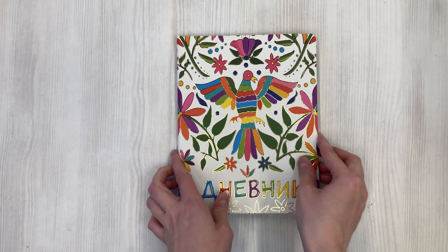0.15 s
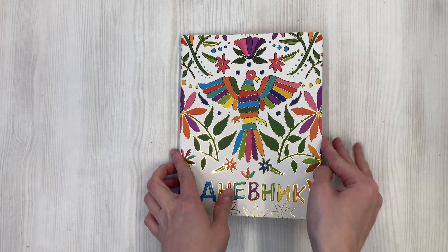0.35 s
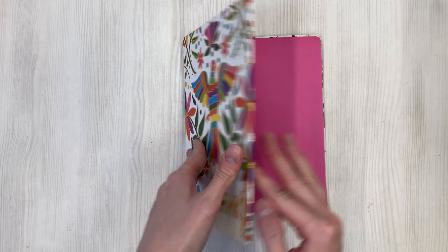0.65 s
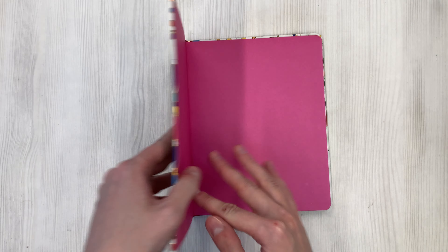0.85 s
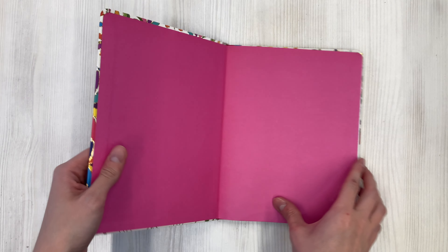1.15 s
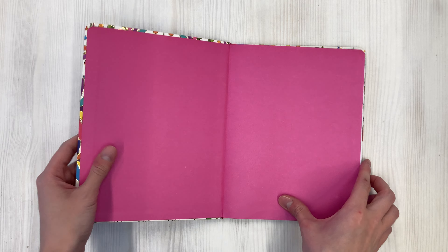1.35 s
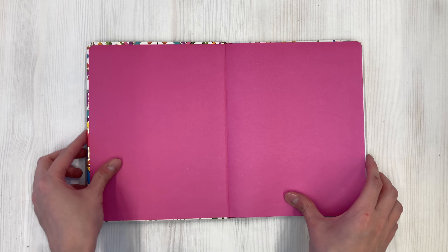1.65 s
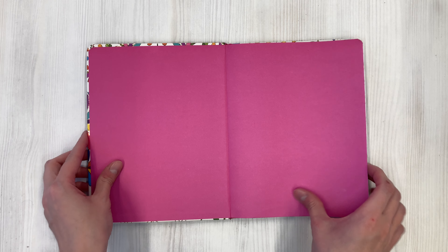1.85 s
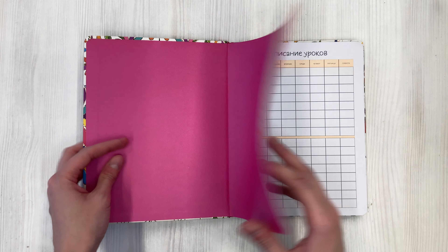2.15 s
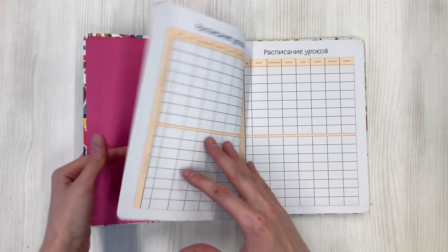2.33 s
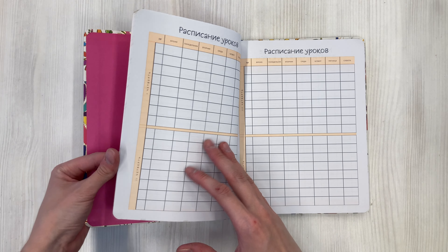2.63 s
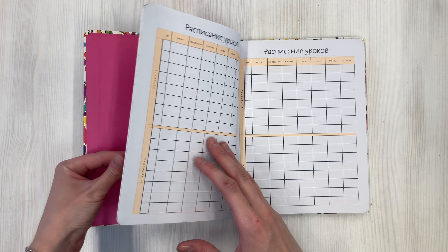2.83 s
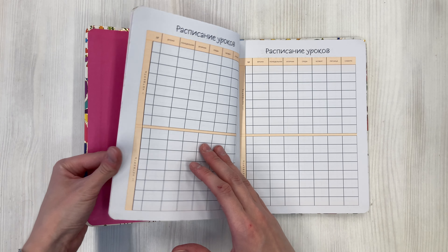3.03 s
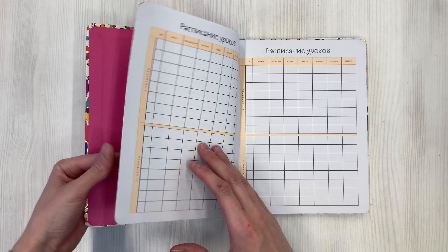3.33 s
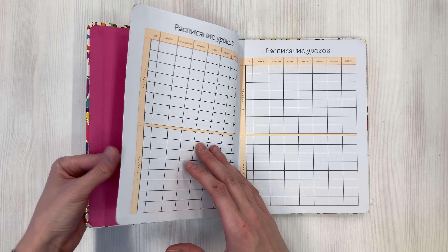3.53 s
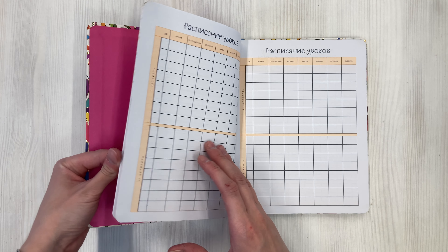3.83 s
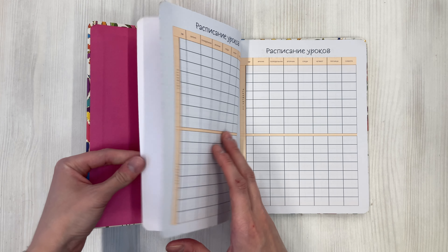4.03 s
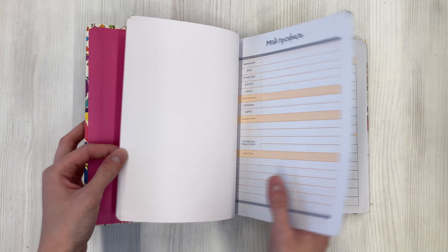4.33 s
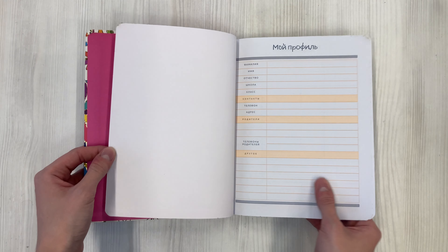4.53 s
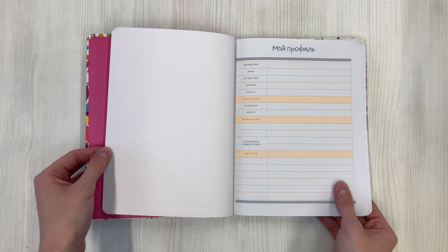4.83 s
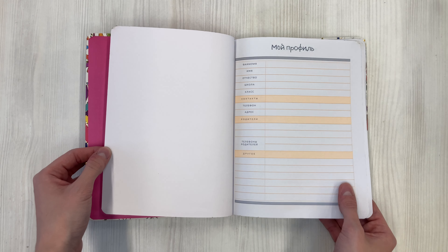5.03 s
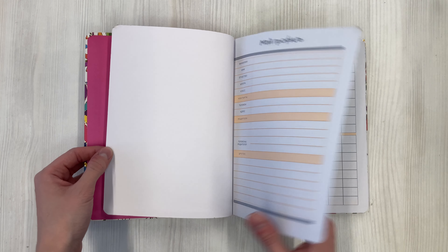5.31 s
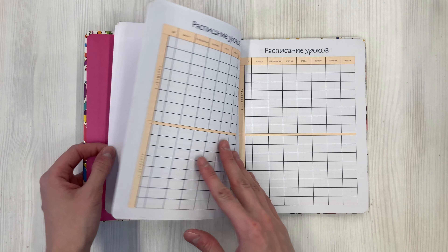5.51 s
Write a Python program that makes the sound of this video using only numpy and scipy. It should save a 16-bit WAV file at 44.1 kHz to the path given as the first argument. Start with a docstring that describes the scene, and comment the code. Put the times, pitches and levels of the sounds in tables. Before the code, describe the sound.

In a quiet room with a low steady hum, hands shift a hardcover notebook with a knock and small thump. Ticking cracks lead to loud snaps as the stiff cover opens, with rustle and a soft push of air. A page turns, fingers rub faintly, then two more page turns bring brisk swishes and papery flaps. Phone close above the table, slight room reflections.

```python
"""A quiet humming room: hands open a stiff hardcover book on a table and turn its pages, under a phone.
The hum is coloured noise with two narrow drones. Fingers hiss and sheets swish as shaped noise.
Sheets and cover flap and knock as short ringing noise puffs. The glued spine cracks and crackles:
noise bursts through its resonances. Wall bounces and a short room tail surround the pops and cracks."""
import sys
import numpy as np
from scipy import signal
from scipy.fft import rfft, irfft, next_fast_len
from scipy.io import wavfile
from scipy.ndimage import uniform_filter1d, map_coordinates

SR = 44100
rng = np.random.default_rng(int(sys.argv[2]) if len(sys.argv) > 2 else 0)


def materialize(psi):
    """Save the field psi as 16-bit PCM at rate SR to the path in sys.argv[1].

    A 1-D psi becomes a single channel; in a 2-D psi each row is a channel.
    """
    bounded = np.clip(np.atleast_2d(psi).T, -1, 1)
    quanta = np.round(bounded * 32767).astype(np.int16)
    wavfile.write(sys.argv[1], SR, quanta)


N = 250047

# left-right likeness of the hum and of the air pushed by the cover: pitch_hz, likeness (1 = same)
HUM_LIKENESS = [(25, 0.94), (60, 1), (200, 0.89), (330, 0.78), (600, 0.073), (1500, 0.1), (4000, 0.059)]
# left-right likeness of the book's noises: pitch_hz, likeness (1 = same)
BOOK_LIKENESS = [(600, 1), (1500, 0.75), (2500, 0.21), (5000, 0.21)]


def amp(db):
    """dB to gain."""
    return 10 ** (np.asarray(db) / 20)


def unit(x):
    """Scaled to rms 1."""
    return x / np.sqrt(np.mean(x ** 2) + 1e-20)


def along(points, hz):
    """Reads (Hz, value) points on a log frequency axis."""
    point_hz, values = np.transpose(points)
    return np.interp(np.log(hz + 1), np.log(point_hz + 1), values)


def between(points, x):
    """Reads (x, value) points on a linear axis."""
    return np.interp(x, *np.transpose(points))


def spectrum(points):
    """The gain response drawn by (Hz, dB) points."""
    return lambda f: amp(along(points, f))


def curves(rows):
    """One value per sample for each column after start_s; -150 outside the table, silent if in dB."""
    start_s, *columns = np.transpose(rows)
    t = np.arange(N) / SR
    return [np.interp(t, start_s, column, left=-150, right=-150) for column in columns]


def wobble(rate):
    """A smooth random curve, rate knots a second."""
    knots = rng.standard_normal(int(N * rate / SR) + 4)
    return map_coordinates(knots, [np.arange(N) * rate / SR])


def filtered(x, response):
    """x times a complex response of frequency."""
    size = next_fast_len(x.shape[-1] + 4096)
    shaped = rfft(x, size) * response(np.fft.rfftfreq(size, 1 / SR))
    return irfft(shaped, size)[..., :x.shape[-1]]


def resonances(modes):
    """Causal band-pass modes (centre Hz, width Hz, dB), summed with alternating sign."""
    def response(f):
        total = 0
        for k, (centre, width, db) in enumerate(modes):
            damping = 1j * f * width
            total = total + (-1) ** k * amp(db) * damping / (centre * centre - f * f + damping)
        return total
    return response


def rush(colour, alike, patchy_db, grain_db):
    """Coloured stereo noise of rms 1; patches in time and pitch, and fast grains, are shared by both sides."""
    z = signal.stft(rng.standard_normal((2, N)), nperseg=256)[2]
    field = uniform_filter1d(rng.standard_normal(z.shape[1:]), size=6, axis=0)
    field = uniform_filter1d(field, size=20, axis=1)
    pair = signal.istft(z * amp(patchy_db * unit(field)), nperseg=256)[1][:, :N]
    pair = pair * amp(grain_db * wobble(350))

    def mid_and_side(hz):
        angle = np.arccos(np.clip(along(alike, hz), -1, 1)) / 2
        return colour(hz) * np.array([np.cos(angle), np.sin(angle)])
    mid, side = filtered(pair, mid_and_side)
    return unit(np.array([mid + side, mid - side]))


def stroke(s, length, db, swell_db, edge=0.015):
    """Gain of one stroke: quick edges, and a steady swell or fade in dB between them."""
    t = np.arange(N) / SR - s
    gate = np.clip(t / edge + .5, 0, 1) * np.clip((length - t) / edge + .5, 0, 1)
    return gate ** 2 * amp(db + swell_db * (np.clip(t / length, 0, 1) - .5))


def add(track, s, sound):
    """Mixes a short stereo sound into the track at time s."""
    part = track[:, round(s * SR):][:, :sound.shape[1]]
    part += sound[:, :part.shape[1]]


def tail(colour):
    """A fresh stereo room tail after a 300-sample gap; each frequency dies at its own speed."""
    # decay of the room: pitch_hz, t60_s
    room_decay = [(300, 0.85), (1500, 0.5), (5000, 0.72), (14000, 0.35)]
    hz, t, z = signal.stft(rng.standard_normal((2, SR // 2)), SR, nperseg=256)
    z = z * amp(-60 * t / along(room_decay, hz)[:, None])
    # before colouring, the left side has energy 1
    energy = np.linalg.norm(signal.istft(z[0], SR, nperseg=256)[1])
    coloured = signal.istft(z * colour(hz)[:, None], SR, nperseg=256)[1]
    return np.pad(coloured / energy, ((0, 0), (300, 0)))


def bounced(x):
    """A sound and its delayed, softer copies off the nearest walls."""
    # wall bounces: delay_s, level_db
    bounces = [(.0084, -14), (.0114, -11)]
    copies = 0
    for delay_s, db in bounces:
        late = np.pad(x, [(0, 0), (round(delay_s * SR), 0)])
        copies = copies + amp(db) * late[:, :x.shape[1]]
    return x + copies


def roomy(x, wet_db):
    """A short sound, its bounces, and a tail with the broad colour of the sound."""
    power = uniform_filter1d(np.abs(rfft(x, 4096)) ** 2, size=40)
    bins = np.fft.rfftfreq(4096, 1 / SR)
    wet = tail(lambda hz: np.sqrt(np.abs(np.interp(hz, bins, power))))
    direct = np.pad([x, x], [(0, 0), (0, wet.shape[1] - len(x))])
    return amp(wet_db) * wet + bounced(direct)


def hum():
    """The low noise of the room: a broad hum that drifts slightly in level, and narrow drones."""
    # colour of the hum: pitch_hz, level_db (per Hz)
    hum_colour = [(15, -46), (25, -15.5), (48, -11), (76, -9), (185, -1.5), (217, -8), (354, -8),
                  (451, -12), (714, -19), (950, -25.5), (1700, -41), (3000, -52), (6200, -63), (10000, -57),
                  (15800, -68), (16100, -100)]
    # narrow bands in the hum: pitch_hz, width_hz, level_db
    drone_bands = [(102.14, 5.6, -58), (188.3, 16, -60)]
    drones = 0
    for hz, width, db in drone_bands:
        band = rush(resonances([(hz, width, 0)]), HUM_LIKENESS, patchy_db=0, grain_db=2)
        drones = drones + amp(db) * band
    level = amp(-51 + 1.67 * wobble(3.126))
    return drones + level * rush(spectrum(hum_colour), HUM_LIKENESS, patchy_db=1.21, grain_db=-1.5)


def rubbing():
    """Skin on paper hisses, sheets swish and rumble as they bend; the pressure is never quite even."""
    # spectra of finger hiss and sheet swish: pitch_hz, level_db (per Hz)
    hiss_colour, swish_colour = [(4000, -43.5), (6000, -9.5), (7800, -1.5), (9000, -1), (10300, -2.5),
                                 (12500, -1.5), (15700, -13.5), (16000, -58.5)], [(1500, -29.5), (2500, -4.5), (3600, -2.5), (4800, -4.5),
                                               (6200, -5), (9000, -35)]
    # modes of a slack and of a taut sheet: pitch_hz, width_hz, level_db
    slack_modes, taut_modes = [(1000, 280, 0), (635, 140, -5)], [(1400, 850, 0), (2195, 900, -1.5)]
    # seven movements (cover lifted, cover swung open, endpaper turned, pages parted, hand slid under,
    # page turned, page taken back): start_s, finger_hiss_db, sheet_bending_db
    moves = [
        [(0, -56, -54.5), (.09, -74.5, -73), (.17, -55.5, -65), (.2, -70, -56), (.4, -82, -69),
         (.52, -57.5, -67), (.64, -54, -58.5), (.72, -59, -56), (.83, -63, -90)],
        [(.855, -55.5, -66), (.97, -59.5, -60.5), (1.03, -56, -52), (1.06, -51.5, -44), (1.17, -54.5, -48.5),
         (1.21, -62.5, -58), (1.31, -69, -63), (1.35, -60, -59), (1.5, -70, -63.5), (1.75, -76, -64.5)],
        [(1.75, -76, -74), (1.846, -61.5, -66.5), (1.97, -60.5, -58), (2.054, -61.5, -60.5),
         (2.114, -57, -59.5), (2.222, -59.5, -57), (2.408, -73.5, -66), (2.6, -83, -73.5)],
        [(3.135, -69, -64.5), (3.2, -70, -70), (3.29, -62.5, -58.5), (3.325, -44.5, -61), (3.345, -67, -55),
         (3.42, -83, -73.5)],
        [(3.85, -80, -76), (3.89, -71.5, -76), (4.05, -65, -66.5), (4.16, -68, -61.5), (4.18, -83, -73)],
        [(4.18, -79.5, -68), (4.3, -83, -66), (4.36, -64, -64), (4.43, -62.5, -57.5), (4.45, -52.5, -54),
         (4.76, -54, -67), (4.775, -83, -66), (4.8, -66, -66)],
        [(4.94, -66.5, -69), (5.05, -60, -63), (5.12, -53, -54), (5.2, -60.5, -66), (5.33, -63.5, -68),
         (5.395, -51.5, -53), (5.42, -65, -65), (5.66, -72.5, -69.5)],
    ]
    # short slides of a finger on the paper: start_s, length_s, finger_hiss_db, sheet_bending_db
    slides = [(1.944, 0.02, -59, -54), (2.13, 0.022, -47.5, -63), (2.643, 0.092, -64.5, -69),
              (2.849, 0.17, -71.5, -71), (3.029, 0.067, -69.5, -68.5), (3.43, 0.093, -68, -64),
              (3.589, 0.044, -70.5, -83), (3.642, 0.052, -76, -71.5), (4.891, 0.022, -61.5, -64.5),
              (5.131, 0.061, -73, -46), (5.647, 0.022, -59.5, -58)]
    # the sheet in hand: start_s, swish_over_hiss_db, tautness (0-1)
    sheet = [(0, -4.5, 0.17), (.82, -11.5, 0.13), (.86, 5.5, 0), (1.1, -1, 0.25), (1.4, 4, 0),
             (2.0, 1.5, 0.42), (2.3, -4.5, 0.25), (2.9, -9.5, .25), (3.3, -8, 0.5), (3.6, -4, 0.24),
             (4.3, -2.5, 0.16), (4.5, -7, 0.87), (5.0, -7.5, 0.87), (5.2, -1.5, 0.68), (5.67, -4.5, 0.85)]
    # one long thumb stroke along the page edge: length_s, level_db, swell_db
    thumb_stroke = (0.3, -53.5, 8.2)
    # resonances of the page edge: pitch_hz, width_hz, level_db
    edge_modes = [(7770, 1200, -5), (10100, 360, 3), (11940, 530, -3)]

    gains = sum(amp(curves(move)) for move in moves)
    for s, length, hiss_db, bend_db in slides:
        gains = gains + np.outer(amp([hiss_db, bend_db]), stroke(s, length, 0, swell_db=1))
    hiss, bend = gains
    swish_db, taut = curves(sheet)
    taut = np.clip(taut, 0, 1)

    # gain, colour, grain dB: the bending sheet crinkles more than the skin hisses
    layers = [(hiss, spectrum(hiss_colour), 2),
              (hiss * amp(swish_db), spectrum(swish_colour), 2.5),
              (bend * np.sqrt(1 - taut), resonances(slack_modes), 3),
              (bend * np.sqrt(taut), resonances(taut_modes), 3)]
    paper = 0
    for gain, colour, grain_db in layers:
        paper = paper + gain * rush(colour, BOOK_LIKENESS, patchy_db=3.0, grain_db=grain_db)
    edge_noise = rush(resonances(edge_modes), BOOK_LIKENESS, patchy_db=-0.5, grain_db=0.0)
    thumb = stroke(4.44, *thumb_stroke) * edge_noise
    near = amp(0.87 * wobble(40)) * paper + thumb
    wet = signal.fftconvolve(near, tail(np.ones_like), axes=1)[:, :N]
    return near + amp(-16.5) * wet


def cover_swing():
    """Air pushed by the cover: one low stroke of noise with soft edges."""
    # the stroke (length_s, level_db, swell_db), then the modes of the air: pitch_hz, width_hz, level_db
    swing_stroke, air_modes = (0.25, -49.5, -0.5), [(45, 25, -11), (295, 390, -3)]
    air = rush(resonances(air_modes), HUM_LIKENESS, patchy_db=3, grain_db=0.5)
    return stroke(1.0, *swing_stroke, edge=0.046) * air


def table_thud():
    """The table top answers a knock with a low decaying sine."""
    # the answer of the table top: level_db, pitch_hz, t60_s
    db, hz, t60 = (-27.5, 69.5, 0.12)
    t = np.arange(SR // 4) / SR
    tone = amp(db - 60 * t / t60) * np.sin(2 * np.pi * hz * t)
    return tone * (1 - np.exp(-t / 0.0084)) * np.ones((2, 1))


def flaps():
    """A sheet or board pops: a noise puff ringing round its pitch, with a shorter bright edge."""
    # flaps and knocks of sheets and cover: start_s, body_peak_db, pitch_hz, treble_db (over the body)
    pops = [(0.1789, -19.5, 725, -2), (0.1845, -31.5, 700, -25), (0.5635, -41, 910, -0.5),
            (0.8433, -31, 1570, 3), (0.9999, -23, 1050, -3.5), (1.3273, -47.5, 1060, 11),
            (2.1366, -33, 1890, -6), (2.1556, -31.5, 900, -9), (2.4472, -51, 1200, -5),
            (2.4528, -45, 810, -22.5), (3.3473, -35, 1088, -35.5), (3.519, -49.5, 1014, -24),
            (4.4673, -36, 1140, -8.5), (5.1133, -29, 1300, -11.5), (5.139, -32.5, 1530, -17),
            (5.1521, -31.5, 1280, -36), (5.182, -34, 1150, -14), (5.2999, -24.5, 1034, -7)]
    # a bright pop dies sooner: treble_db, t60_s
    ring = [(-4, 0.031), (-3.5, 0.014)]
    # a dull pop rings on a narrower pitch: treble_db, width over pitch (ratio)
    breadth = [(-34.5, 0.28), (-8, 0.76)]
    edge_response = resonances([(2420, 900, -1), (4400, 2600, 0)])
    out = np.zeros((2, N))
    t = np.arange(4096) / SR
    rise = 1 - np.exp(-t / 0.00025)
    for s, db, hz, treble_db in pops:
        t60 = between(ring, treble_db)
        # a bright pop has more overtone
        mode = resonances([(hz, between(breadth, treble_db) * hz, 0),
                           (2.654 * hz, 0.54 * hz, 0.95 * treble_db)])
        puff = rng.standard_normal(len(t)) * amp(-60 * t / t60) * rise
        body = filtered(puff, lambda f: mode(f) ** 2)  # squared for steep skirts
        short_puff = rng.standard_normal(len(t)) * amp(-60 * t / (0.95 * t60)) * rise
        edge = filtered(short_puff, edge_response)
        pop = body / np.abs(body).max() + amp(treble_db) * edge / np.abs(edge).max()
        add(out, s, roomy(amp(db) * pop, wet_db=-7.5))
    add(out, pops[0][0] + 0.0203, table_thud())  # just after the first knock
    return out


def spine():
    """Glue lets go: a spiky crackle and single cracks, all through the spine's resonances."""
    # glue tearing in the spine, a dense crackle: start_s, level_db
    tear = [(0.5, -83), (0.61, -83), (0.734, -85), (0.894, -59), (1.018, -63), (1.258, -68.5), (1.386, -66),
            (1.45, -77.5)]
    # resonances of the spine: pitch_hz, width_hz, level_db
    spine_modes = [(1460, 760, -14), (4750, 630, 0.5), (7150, 3900, -6), (10150, 2000, 2.5),
                   (13220, 2400, -1)]
    # single cracks: start_s, peak_db, low_modes_db
    cracks = [(0.507, -42, -13), (0.528, -25.5, -3.5), (0.534, -31, -6.5), (0.554, -32, -4),
              (0.564, -24, -3), (0.596, -31.5, -3), (0.615, -26.5, 0.5), (0.649, -31, -2.5),
              (0.843, -12, 3), (0.986, -13, -0.5), (0.999, -20, -8), (1.083, -36, -5), (1.113, -30, -8),
              (1.132, -37, -8.5), (1.159, -17.5, -10), (1.197, -34, -2), (1.283, -34, -2), (1.325, -14, -5),
              (2.143, -25.5, 10), (2.244, -40, -4), (2.446, -39.5, -7), (2.986, -57, -3),
              (3.658, -48, -25.5), (3.679, -47.5, -25), (5.173, -48, -5)]
    crack_t60_s = 0.0052
    body = resonances(spine_modes)
    out = amp(curves(tear)[0]) * rush(body, BOOK_LIKENESS, patchy_db=-4.5, grain_db=-2)
    t = np.arange(1024) / SR
    envelope = amp(-60 * t / crack_t60_s) * (1 - np.exp(-t / .0004))
    for s, db, low_db in cracks:
        burst = rng.standard_normal(len(t)) * envelope
        # a duller crack has more of the low modes
        tilt = lambda f: 1 + (amp(low_db) - 1) / (1 + (f / 6500) ** 6)
        crack = filtered(burst, lambda f: body(f) * tilt(f))
        add(out, s, roomy(amp(db) * crack / np.abs(crack).max(), wet_db=-9))
    return out


def scene():
    """Room and book."""
    return hum() + rubbing() + cover_swing() + flaps() + spine()


def record(dry):
    """Two ports of a phone lean left in the middle; the treble of one feeds both sides; the top is cut."""
    # level between the sides: pitch_hz, left_minus_right_db
    lean = [(100, 0.7), (500, 2), (1800, 3.5), (4500, 3), (6000, 1)]
    # phase of the shared treble, right side ahead: pitch_hz, lead_rad
    treble_lead = [(4500, 1), (5400, 3.2), (6900, 6.3), (9130, 9.43), (11250, 12.57), (13500, 15.7),
                   (15500, 18.8), (17500, 21.9)]
    # phase of the right port's own sound, left side ahead: pitch_hz, left_lead_rad
    skew = [(600, 0), *[(1400, -1.2), (2000, 0.68), (2500, 1.28), (3300, 1.85), (3800, 0.79), (4600, -1.6)]]
    one_port_hz, top_hz = 6120, 16700  # one port takes over around the first; nothing from the second up
    share = lambda f: 1 / (1 + (one_port_hz / (f + 1)) ** 12)

    def right_port(f):
        gain = amp(-along(lean, f) / 2) * np.sqrt(1 - share(f))
        return gain * np.exp(-1j * along(skew, f))

    def shared_treble(f):
        return np.sqrt(share(f)) * np.exp(1j * between(treble_lead, f))

    left = filtered(dry[0], lambda f: amp(along(lean, f) / 2))
    own = filtered(dry[1], right_port)
    fed = filtered(np.pad(left, (64, 0)), shared_treble)[64:]  # padded as the phase lead reaches back
    top_fade = lambda f: (f < top_hz) * amp(np.interp(f, [15700, 16100], [0, -8]))
    return filtered(np.array([left, own + fed]), top_fade)


dry = scene()
out = record(dry)
materialize(out)
```